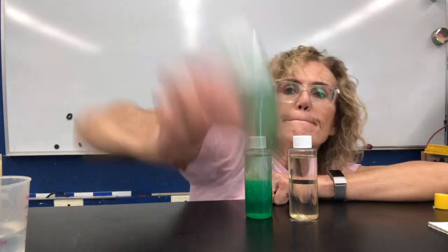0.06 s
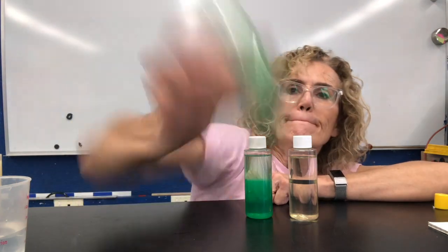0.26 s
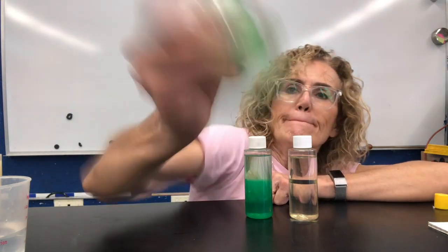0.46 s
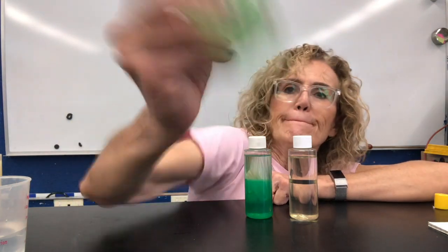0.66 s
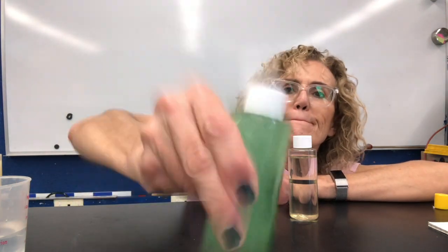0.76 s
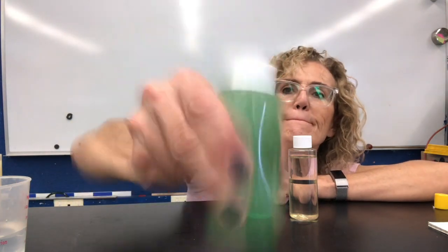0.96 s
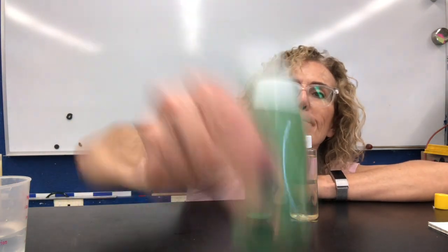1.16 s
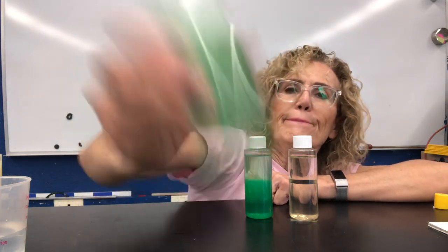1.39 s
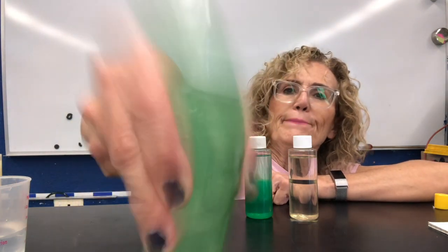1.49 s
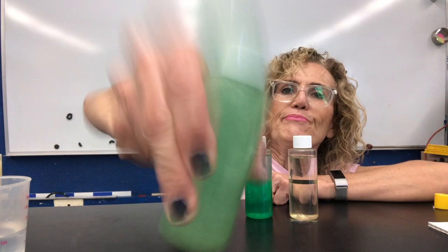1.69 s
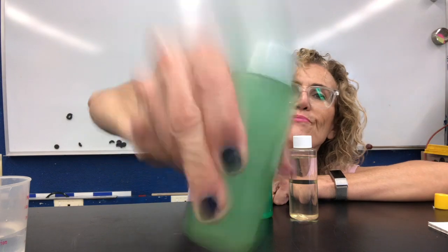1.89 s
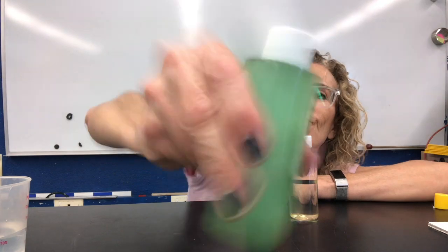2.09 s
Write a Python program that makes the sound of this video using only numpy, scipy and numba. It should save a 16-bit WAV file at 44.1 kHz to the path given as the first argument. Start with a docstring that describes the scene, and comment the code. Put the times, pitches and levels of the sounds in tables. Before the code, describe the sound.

Water in a small capped bottle is shaken hard close to a phone microphone, with quick glugs, bright splashes and fizzy churn; midway the table takes one loud knock, then the sloshing gets fainter in a quiet room.

```python
"""In a classroom a small capped bottle of water is shaken hard close to a phone. Slugs of water slam into the
ends with gliding, mostly falling glugs; splashes and ticking drops are short damped sines, splashes with noise
smacks; dense random grains give the churn, fizz and swishing spray. Once the table under the phone takes a
knock, made of damped modes, a rough noise tail and a crack; lamps hum over shaped noise of the room air."""
import sys
import numpy as np
from scipy import signal
from scipy.fft import rfft, irfft
from scipy.io import wavfile
from scipy.ndimage import uniform_filter1d
from numba import njit

SR = 44100
rng = np.random.default_rng(int(sys.argv[2]) if len(sys.argv) > 2 else 0)


def put_to_file(sound):
    """Save the sound as 16-bit audio at rate SR, in the file named by the first command-line argument."""
    columns = np.atleast_2d(sound).T  # one column per channel
    safe = np.clip(columns, -1, 1)
    whole_steps = np.round(safe * 32767)
    wavfile.write(sys.argv[1], SR, whole_steps.astype(np.int16))


def ratio_of_db(decibels):
    """Turn decibels (scalar or array-like) into linear amplitude factors; 0 dB maps to 1."""
    return 10 ** (np.asarray(decibels, float) / 20)


N = 94462

# splashes on the bottle wall: (time [s], level [dB], pitch [Hz])
SPLASHES = [(0.0295, -26.5, 3270), (0.0532, -23.5, 3800), (0.0755, -27, 3920), (0.092, -24.5, 3530),
            (0.2301, -25.5, 3650), (0.3298, -34, 2130), (0.3428, -27, 2490), (0.3662, -30, 2160),
            (0.408, -26, 3920), (0.444, -29.5, 1600), (0.548, -24.5, 3850), (0.5701, -25, 3200),
            (0.6092, -21, 4270), (0.655, -27, 4360), (0.7326, -22, 3880), (0.9084, -30, 1970),
            (0.9652, -28, 2150), (0.9807, -43, 1420), (1.1044, -27.5, 2380), (1.1566, -36.5, 2490),
            (1.269, -25, 1700), (1.313, -28, 4400), (1.391, -33, 2870), (1.4528, -35, 2240),
            (1.5397, -37.5, 2380), (1.564, -29.5, 3550), (1.6662, -35, 1890), (1.677, -31.5, 3520),
            (1.7559, -34, 4030), (1.766, -30.5, 2370), (1.867, -41.5, 2980), (1.926, -40, 3760),
            (1.9625, -35.5, 1910), (2.1111, -37, 1890)]


def unit(x):
    """Normalization: a signal divided by its rms has mean power 1."""
    return x / np.sqrt(np.mean(x ** 2))


def band(x, lo_hz, hi_hz):
    """Band-pass filtering: a Butterworth filter passes mainly the range between two corners."""
    corners = [lo_hz, min(hi_hz, .45 * SR)]
    return signal.sosfilt(signal.butter(2, corners, "bandpass", fs=SR, output="sos"), x)


def noise_band(lo_hz, hi_hz):
    """Band noise: filtered white noise, scaled to mean power 1."""
    return unit(band(rng.standard_normal(N), lo_hz, hi_hz))


def curve(s, db):
    """Envelope: levels in dB joined by straight lines, turned into amplitude."""
    return ratio_of_db(np.interp(np.arange(N) / SR, s, db))


@njit
def rings(n, at, hz, t60, rise, size, start, fall):
    """Damped resonance: sines swell over rise [s] and decay, the pitch gliding from start * hz towards hz."""
    y = np.zeros(n)
    for k in range(len(at)):
        first = int(at[k] * SR)
        phase = 0.
        for j in range(min(int(t60[k] * SR), n - first)):
            t = j / SR
            glide = 1 + (start[k] - 1) * np.exp(-t / fall)
            phase += 2 * np.pi * hz[k] * glide / SR
            swell = (1 - np.exp(-t / rise[k])) ** 2
            y[first + j] += size[k] * swell * 1000 ** (-t / t60[k]) * np.sin(phase)
    return y


def air():
    """Broadband flow noise: white noise is shaped in frequency, as room ventilation sounds."""
    # spectrum of the room air: (frequency [Hz], relative level [dB])
    spectrum = [(30, -15), (50, -2), (175, -2), (344, -12.5), (607, -12), (1100, -17.5), (2000, -47.5),
                (4000, -46.5), (16000, -64)]
    level_db = -56.5
    f = np.maximum(np.arange(N // 2 + 1) * SR / N, 1)
    hz, db = np.array(spectrum, float).T
    shape = ratio_of_db(np.interp(np.log(f), np.log(hz), db))
    return ratio_of_db(level_db) * unit(irfft(rfft(rng.standard_normal(N)) * shape, N))


def lamp_hum():
    """Amplitude modulation: steady sines waver under slow random noise."""
    # hum of the lamps: (frequency [Hz], relative level [dB])
    partials = [(119.5, -62), (240, -62)]
    t = np.arange(N) / SR
    hum = np.zeros(N)
    for hz, db in partials:
        waver = 1 + .5 * noise_band(0.86, 15.4)
        hum += ratio_of_db(db + 3.5) * waver * np.sin(2 * np.pi * hz * t)
    return hum


def table_modes(knock_s):
    """Modal vibration with dispersion: bending waves bring low modes later, and these swell more slowly."""
    # modes of the table top: (frequency [Hz], relative level [dB], t60 [s])
    modes = [(48.7, -27, 0.58), (123.7, -14.5, 0.58), (176.7, 0.5, 0.1), (213.7, 14, 0.043),
             (242.2, -25, 0.22), (292.1, -13.5, 0.32), (345.6, -17.5, 0.47), (400, -4.5, 0.1),
             (525, 3, 0.042), (644, 2.5, 0.084), (800, -20.5, 0.18), (950, -3.5, 0.014), (1225, -11, 0.016)]
    # modes that swing the other way under the phone: (row of the modes, from 0)
    opposed = [8]
    level_db, rise_cycles = -5.5, .75
    bend_lag = .07  # lag [s] times the square root of the frequency [Hz]
    hz, db, t60 = np.array(modes, float).T
    way = np.where(np.isin(np.arange(len(hz)), opposed), -1., 1.)
    arrival_s = knock_s + bend_lag / np.sqrt(hz)
    return rings(N, arrival_s, hz, t60, rise_cycles / hz, way * ratio_of_db(db + level_db), np.ones(len(hz)), 1.)


def knock():
    """Impact excitation: a blow rings the table modes, then leaves a rough noise tail and a thin crack."""
    # noise bands of the rough tail: (centre [Hz], relative level [dB], t60 [s])
    rattle = [(55, -29, 0.55), (111, -12.5, 0.85), (191, -2, 0.5), (436, -4, 0.34), (800, -2.5, 0.053),
              (1600, -10.5, 0.065)]
    knock_s, rattle_db, rise_cycles = 1.2655, -18.5, 3
    crack_db, crack_t60_s = -42, 0.044
    t = np.maximum(np.arange(N) / SR - knock_s - .003, 0)  # tail and crack start 3 ms late
    tail = np.zeros(N)
    for hz, db, t60 in rattle:
        envelope = (1 - np.exp(-t * hz / rise_cycles)) * 1000 ** (-t / t60)
        tail += ratio_of_db(db + rattle_db) * envelope * noise_band(hz / 1.31, hz * 1.554)
    crack = ratio_of_db(crack_db) * (t > 0) * 1000 ** (-t / crack_t60_s) * noise_band(1100, 13000)
    return table_modes(knock_s) + tail + crack


def reverberation(source):
    """Diffuse reverberation: the source is convolved with decaying noise that starts after 4 ms."""
    level_db, t60_s = -14.5, 0.15
    t = np.arange(SR // 2) / SR
    response = rng.standard_normal(len(t)) * 1000 ** (-t / t60_s) * (t > .004)
    response = response / np.sqrt(np.sum(response ** 2))
    return ratio_of_db(level_db) * signal.fftconvolve(source, response)[:N]


def clumps():
    """Random modulation: drops landing in clumps make the level uneven, at mean power 1."""
    steps_per_s, depth_db = 90, 3.4  # depth before smoothing
    k = int(SR / steps_per_s)
    steps = np.repeat(rng.standard_normal(N // 50)[:N // k + 1], k)
    walk = uniform_filter1d(steps, k // 2)[:N]
    return unit(ratio_of_db(depth_db * walk))


def grains(per_1_4_s, lo_hz, hi_hz, cycles, spread_db, db, smooth_db):
    """Superposition: many bubbles and drops of random pitch and size ring over a smooth noise wash."""
    count = int(per_1_4_s * N / SR / 1.4)
    when, pitch, rarity, damping = rng.random((8000, 4))[:count].T
    hz = lo_hz * (hi_hz / lo_hz) ** pitch
    size = ratio_of_db(-spread_db * np.log(1 - .98 * rarity))
    t60 = cycles * (.5 + 2 * damping) / hz
    swell_s = .22 * t60
    # each pitch rises from 0.901 of its end value, with a time constant of 1.6 ms
    drops = rings(N, when * N / SR, hz, t60, swell_s, size, 0.901 + 0 * hz, 0.0016)
    return ratio_of_db(db) * (unit(drops) + ratio_of_db(smooth_db) * noise_band(lo_hz, hi_hz))


def bottle_wall(x):
    """Resonant coloration: the bottle wall adds weighted bands to the direct sound."""
    # resonances of the wall: (centre [Hz], width [Hz], level [dB])
    resonances = [(500, 950, -11), (1050, 356, -4.5), (2296, 850, -17), (3834, 1150, -6), (7600, 910, -11)]
    return 0.74 * x + sum(ratio_of_db(db) * band(x, hz - w / 2, hz + w / 2) for hz, w, db in resonances)


def churn():
    """Bubble noise: low grains, fizz and fine spray rise and fall in level, coloured by the bottle wall."""
    # churning water: (time [s], fizz level [dB], low-band level against it [dB]);
    # near 1.27 s the low band also carries part of the table knock
    levels = [(0.0, -36, 4.5), (0.01, -44.5, -7.5), (0.08, -46, 0), (0.14, -46, -3.5), (0.168, -37.5, -8.5),
              (0.199, -45.5, -5.5), (0.238, -42, -2), (0.312, -51, -2.5), (0.342, -40, -10.5),
              (0.392, -50, -1), (0.422, -41, -2), (0.502, -49, -9.5), (0.53, -42.5, -4), (0.56, -50, -6),
              (0.58, -46.5, -2), (0.61, -44.5, 7), (0.62, -48, 9), (0.709, -52, -14), (0.728, -38.5, -5),
              (0.76, -48, -8.5), (0.799, -40, -0.5), (0.862, -58, -3), (0.931, -38.5, -10.5),
              (0.95, -55, 4.5), (0.981, -44, -4.5), (1.068, -54, -3), (1.112, -38.5, -14.5),
              (1.138, -56.5, -6), (1.169, -43.5, -1), (1.262, -58.5, 8.5), (1.271, -40, 14),
              (1.31, -45, -11), (1.37, -56.5, -26), (1.392, -44.5, 10), (1.441, -64.5, -2),
              (1.501, -48, -1), (1.529, -66, -13), (1.571, -44.5, -3.5), (1.62, -66, -29),
              (1.66, -62.5, -21), (1.669, -50.5, -18), (1.722, -61.5, 7), (1.772, -45.5, -8.5),
              (1.801, -65.5, 5.5), (1.97, -56.5, -3), (2.011, -69.5, -20), (2.062, -52.5, -0.5),
              (2.101, -61, 3), (2.11, -46, -3.5), (2.14, -60, -5)]
    # hiss of fine spray: (time [s], level [dB])
    swish = [(0.0, -75), (0.02, -56), (0.05, -48), (0.1, -65), (0.22, -58), (0.23, -40), (0.24, -51),
             (0.3, -51), (0.31, -73), (0.35, -52), (0.39, -83), (0.4, -44.5), (0.54, -63), (0.55, -58),
             (0.57, -74), (0.6, -58), (0.61, -35), (0.62, -60), (0.64, -49.5), (0.68, -64), (0.75, -54),
             (0.86, -54), (0.86, -68), (0.91, -51), (0.95, -82), (0.96, -53.5), (1.05, -60), (1.11, -55),
             (1.26, -67.5), (1.27, -51.5), (1.31, -46), (1.38, -72.5), (1.42, -52), (1.47, -80), (1.5, -78),
             (1.58, -54.5), (1.62, -81), (1.64, -56.5), (1.74, -63), (1.77, -76.5), (1.81, -74),
             (1.83, -61.5), (2.01, -75), (2.03, -58.5), (2.12, -66.5), (2.14, -60)]
    # each kind of grain: (density [grains per 1.4 s], low [Hz], high [Hz], decay scale [cycles],
    # size spread [dB], relative level [dB], smooth wash against grains [dB])
    low_grains = (1196, 329.5, 1454, 5, 3.2, -3, -4)
    fizz = (4495, 1304.5, 7497, 11, 3.5, 1, -10)
    spray = (4980, 5991.5, 15988.5, 12.5, 6.5, -1.5, -8)
    s, db, low_db = np.array(levels, float).T
    clump = clumps()
    mixed = curve(s, db + low_db) * grains(*low_grains)
    mixed += clump * curve(s, db) * grains(*fizz)
    mixed += clump * curve(*np.array(swish).T) * grains(*spray)
    return bottle_wall(mixed)


def blips(rows, cycles, swell_cycles=2.37):
    """Damped oscillation: each row rings briefly, its T60 being three times the given cycles."""
    s, db, hz = np.array(rows, float).T
    return rings(N, s, hz, 3 * cycles / hz, swell_cycles / hz, ratio_of_db(db + 4.5), np.ones(len(hz)), 1.)


def ticks():
    """High-pitched damped oscillation: fine drops tick."""
    # ticks of fine drops: (time [s], level [dB], pitch [Hz])
    drops = [(0.0433, -27, 8150), (0.2296, -28.5, 7300), (0.2983, -24, 7670), (0.406, -29, 7350),
             (0.4568, -31, 6900), (0.4775, -30.5, 9600), (0.4943, -33, 10300), (0.549, -26, 8160),
             (0.6095, -26, 8000), (0.7313, -33, 7600), (0.9073, -36, 7280), (1.0355, -35, 7040),
             (1.1019, -29.5, 7100), (1.2675, -29, 7200), (1.297, -28.5, 6630), (1.349, -37, 7000),
             (1.4676, -38, 11000), (1.5409, -37, 6800), (1.5707, -36, 7780), (1.5823, -33.5, 7900),
             (1.6777, -35.5, 6700), (1.8828, -38, 6440)]
    return blips(drops, 9.8)


def smacks():
    """Impulsive excitation: each splash releases a short wide burst of noise."""
    level_db, peak_s = -11.5, 0.0013  # level against the splash; time from onset to peak
    s, db, _ = np.array(SPLASHES, float).T
    hits = np.zeros(N)
    hits[(s * SR).astype(int)] = ratio_of_db(db + level_db)
    t = np.arange(SR // 20) / SR / peak_s
    return signal.fftconvolve(hits, t * np.exp(1 - t))[:N] * noise_band(960, 4700)


def splashes():
    """Impact and resonance: water striking the wall gives a short ring and a noise smack."""
    return blips(SPLASHES, 7.4) + smacks()


def slams():
    """Gliding resonance: each slug of water rings for a few cycles, mostly sinking in pitch."""
    # slug of water hits an end: (time [s], level [dB], start pitch [Hz], end pitch [Hz])
    hits = [(.109, -35, 715, 553), (.229, -28, 1440, 347), (.333, -36.5, 593, 496),
            (0.341, -34.5, 630, 470), (0.373, -39, 510, 428), (0.4207, -28.5, 1810, 575),
            (0.441, -34, 1430, 940), (.513, -37, 1180, 636), (0.595, -35.5, 1280, 1120),
            (0.612, -25, 1600, 355), (0.704, -35.5, 563, 476), (0.769, -36.5, 1230, 1050),
            (0.8013, -28, 1620, 373), (.91, -39.5, 890, 650), (0.832, -39, 557, 500),
            (.857, -41.5, 900, 520), (0.88, -47, 1790, 1280), (0.9842, -28.5, 950, 1190),
            (.995, -34, 800, 750), (1.223, -36.5, 1600, 1370), (1.555, -37.5, 924, 800),
            (1.575, -39.5, 1330, 1160), (1.709, -41.5, 500, 430), (1.766, -37.5, 1050, 820),
            (1.818, -41, 500, 425), (1.962, -42, 1040, 800), (1.457, -37, 895, 550),
            (1.758, -40, 1284, 1230), (2.076, -46, 660, 520), (2.109, -48.5, 1070, 800)]
    t60_s, rise_s, glide_s = 0.016, 0.00061, .002
    swell_db = 8.5  # makes up for the decay during the swell
    s, db, start_hz, end_hz = np.array(hits, float).T
    size = ratio_of_db(db + swell_db)
    return rings(N, s, end_hz, t60_s + 0 * s, rise_s + 0 * s, size, start_hz / end_hz, glide_s)


def water():
    """Linear superposition: churn, ticks, splashes and slams add up to the shaken bottle."""
    return churn() + ticks() + splashes() + slams()


def scene():
    """Superposition in the room: air, hum and knock join the water and its reverberation."""
    bottle = water()
    return (air() + lamp_hum() + knock() + reverberation(bottle) + bottle)[None]


def low_pass(x):
    """Removes everything above the highest recorded frequency."""
    return signal.sosfilt(signal.butter(12, 16430, fs=SR, output="sos"), x)


def record(dry):
    """High-pass filtering and saturation: the phone cuts the deep bass and rounds the loudest peaks."""
    ceiling = 1.6  # amplitude
    thin = signal.sosfilt(signal.butter(2, 38, "highpass", fs=SR, output="sos"), dry)
    rounded = ceiling * np.tanh(thin / ceiling)
    return low_pass(rounded)


dry = scene()
out = record(dry)
put_to_file(out)
```